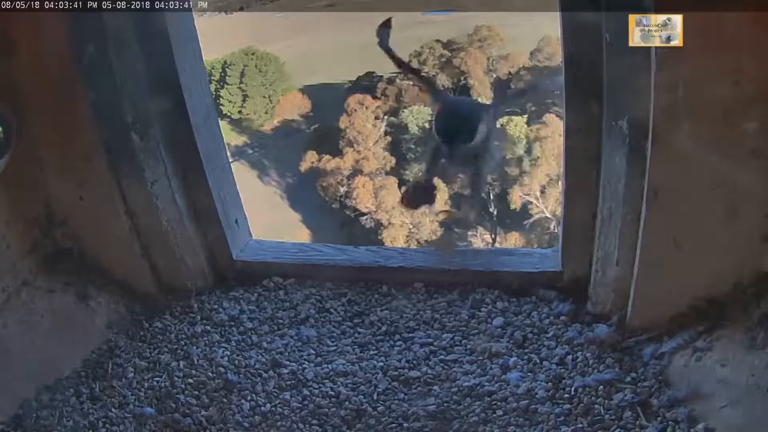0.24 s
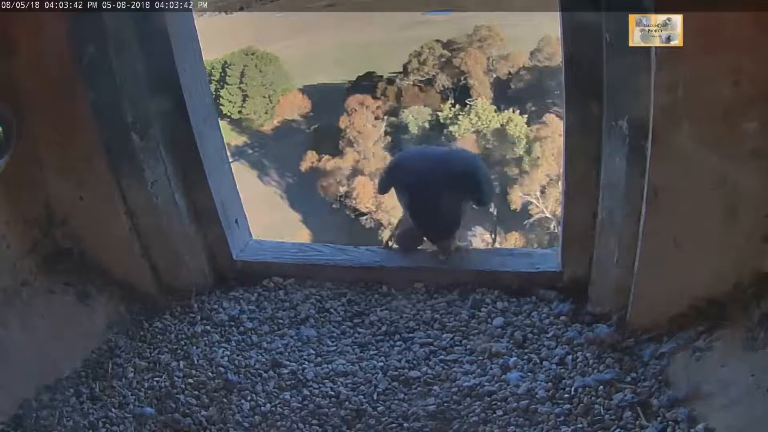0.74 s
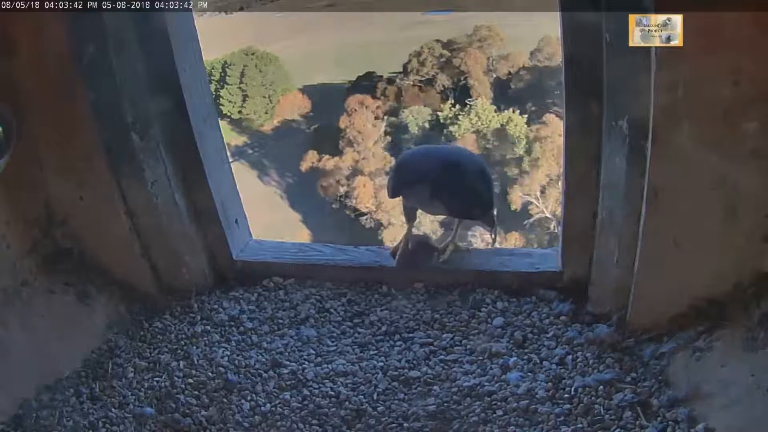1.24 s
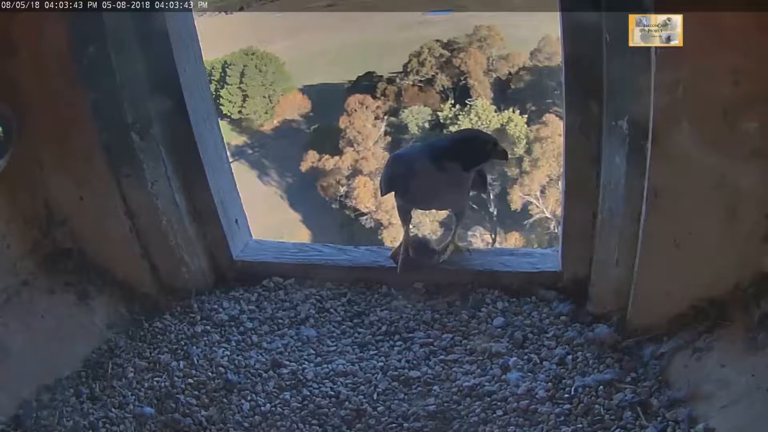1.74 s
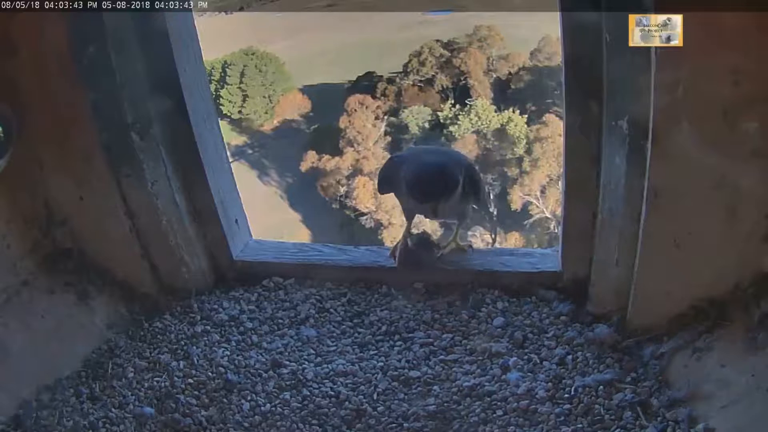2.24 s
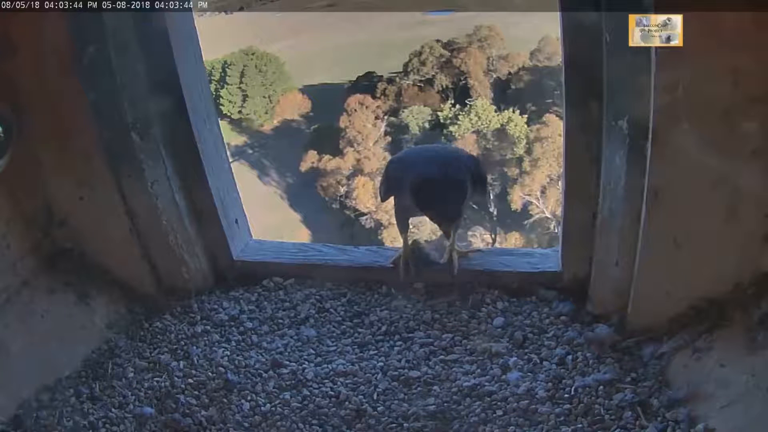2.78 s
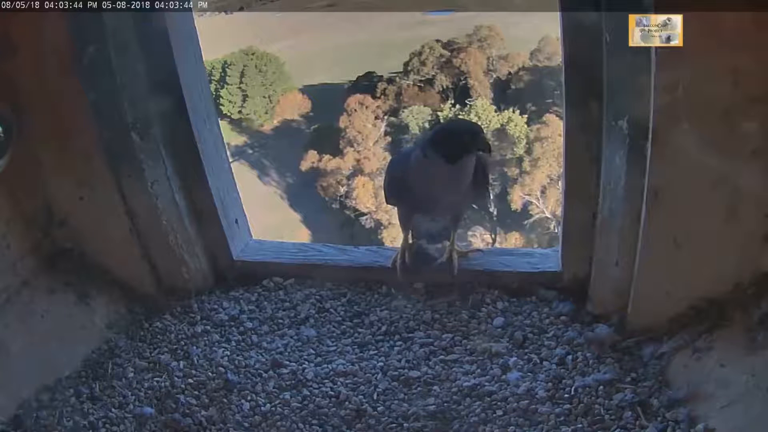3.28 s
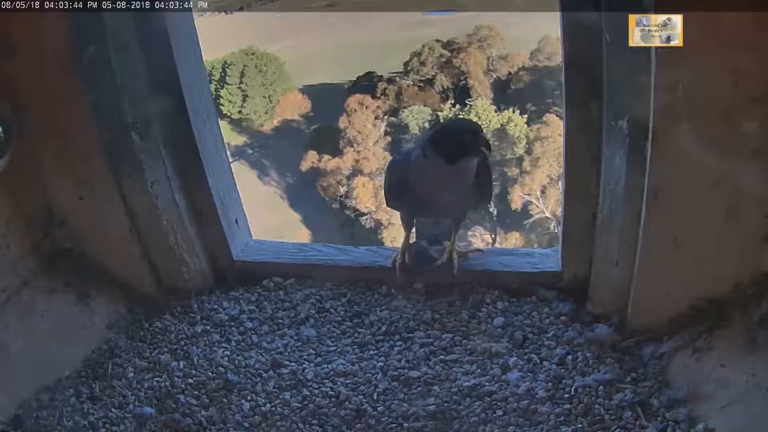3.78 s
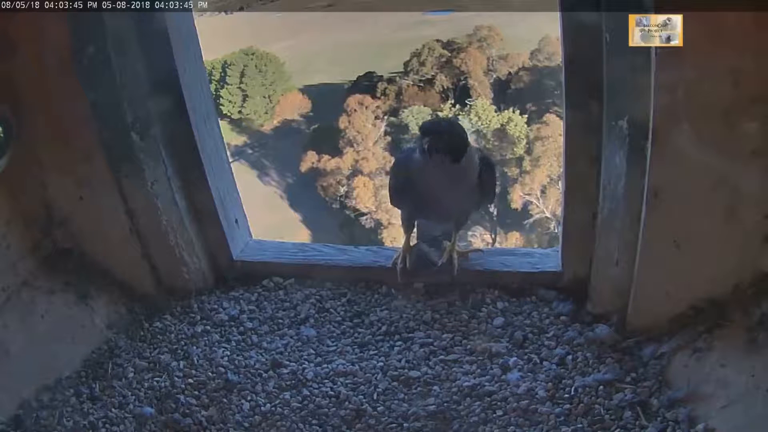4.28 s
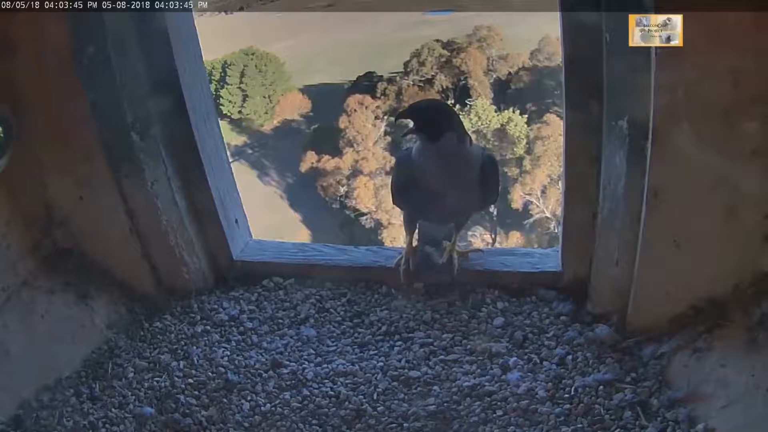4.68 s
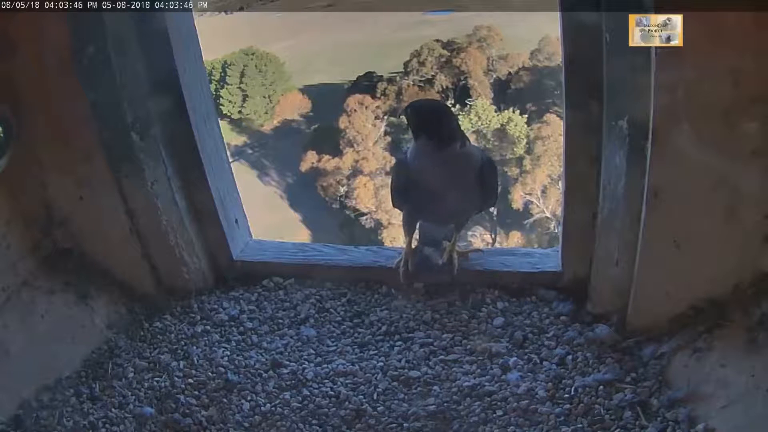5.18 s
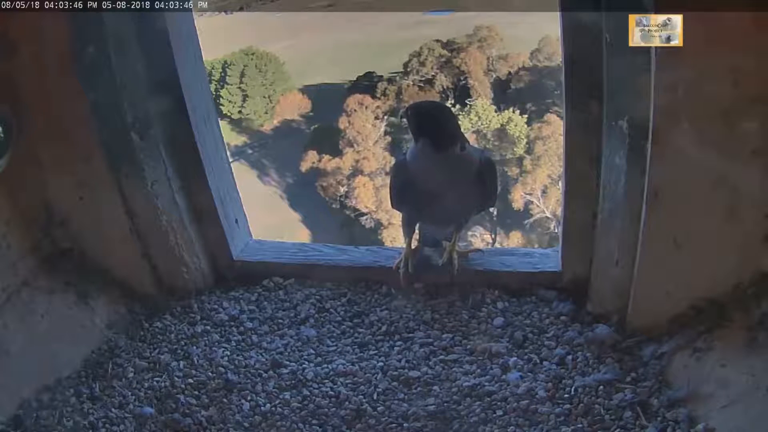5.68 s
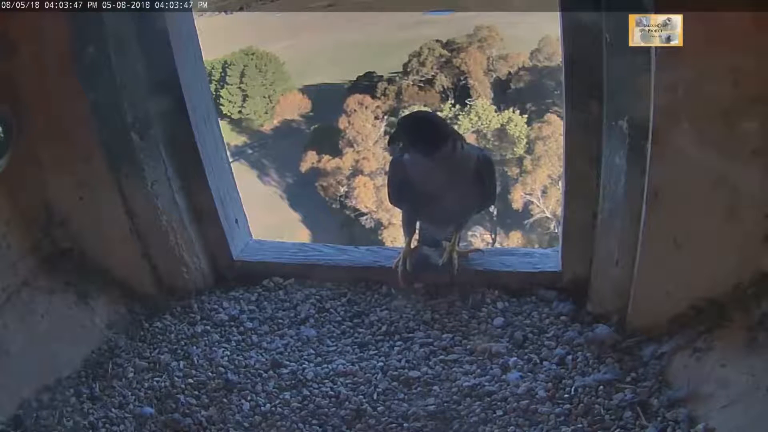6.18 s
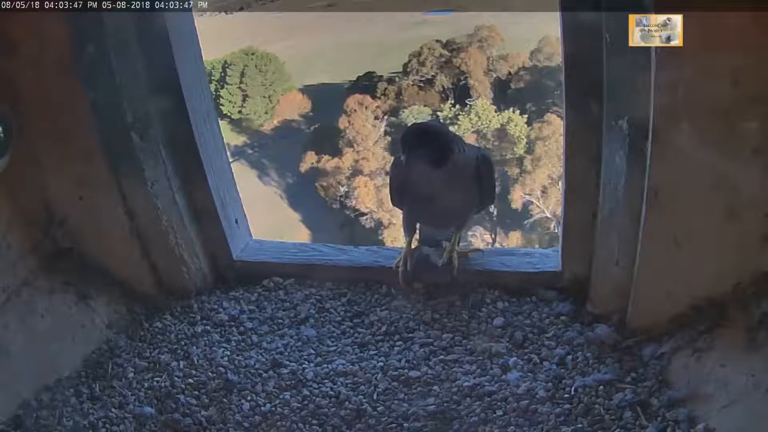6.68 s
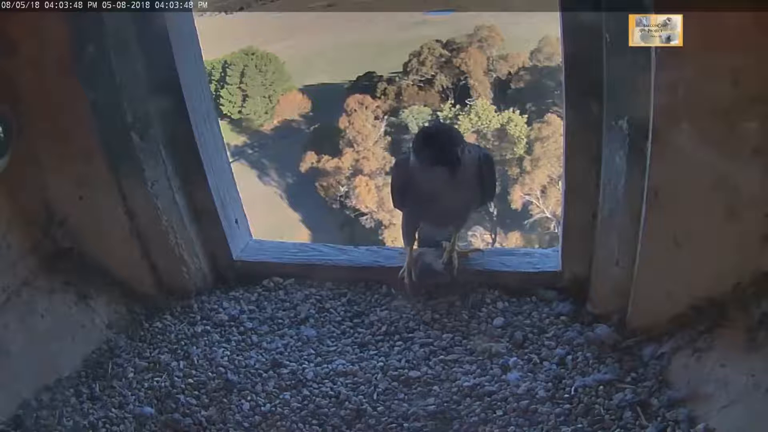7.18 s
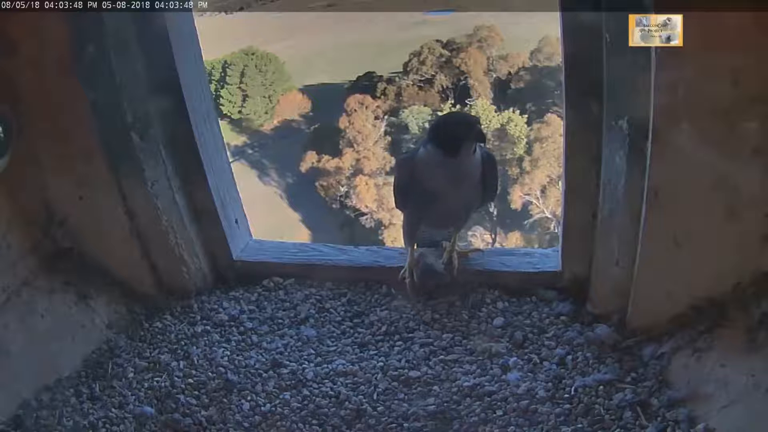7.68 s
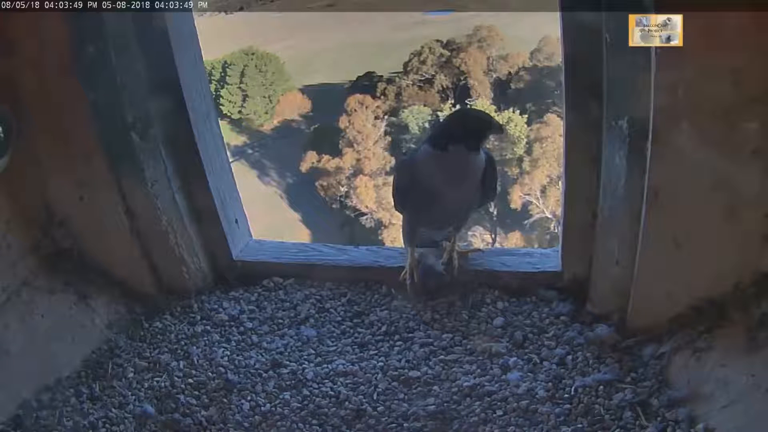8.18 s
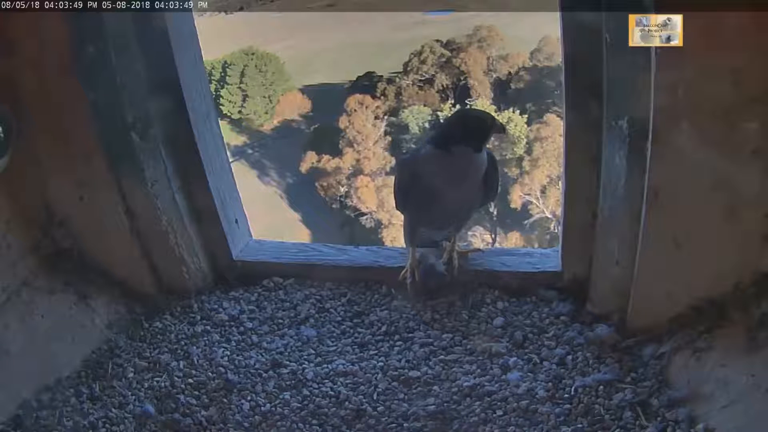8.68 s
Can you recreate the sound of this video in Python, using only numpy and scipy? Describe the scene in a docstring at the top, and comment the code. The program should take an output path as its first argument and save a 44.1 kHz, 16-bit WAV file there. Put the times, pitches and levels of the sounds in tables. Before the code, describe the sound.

A falcon arrives at a wooden nest box with low, soft wing-beat thumps and a knock of feet with a light talon scratch. It calls at once and keeps calling: thin rising whistles snapping into sharp chips that sink into short croaks, mixed with brief yelps. The close microphone catches hard reflections and a ringing tail, over faint hiss and low air rumble.

```python
"""A falcon lands on the ledge of a nest box and calls "ee-chup" again and again, close to a small camera.
Its voice is built from gliding tones and pulses in four registers: a low pulsed croak, a clear yelp,
a sharp chip and a thin whistle. Wing beats are slow swings of pressure; feet knock on the ledge and scratch.
Decaying noise makes the near walls reflect and the box ring on after each sound.
Shaped noise makes a faint hiss and a low rumble of air."""
import sys
import numpy as np
from scipy import signal
from scipy.fft import rfft, irfft, next_fast_len
from scipy.io import wavfile
from scipy.ndimage import map_coordinates

SR = 44100
rng = np.random.default_rng(int(sys.argv[2]) if len(sys.argv) > 2 else 0)


def transcribe(u):
    """Save the signal u as a 16-bit wav file named by the first command-line argument.

    u: samples, shape (n,) or (channels, n), limited to [-1, 1]; the rate is SR.
    q: integer samples, one column per channel.
    """
    v = np.clip(np.atleast_2d(u).T, -1, 1)
    q = np.round(v * 32767).astype(np.int16)
    wavfile.write(sys.argv[1], SR, q)


N = 393870

# All voice levels are relative: each register is trimmed once more in the mix.
# "ee-chup" calls, a rising whistle, then a chip that sinks into a croak:
# whistle [t/s, length/s, start f/Hz, end f/Hz, level/dB],
# chip [t/s, mid f/Hz, level/dB, octave level/dB, half-tone level/dB], croak [level/dB]
CHUP_CALLS = [(.708, 0.039, 4890, 5190, -40, .783, 2497, -28.5, -30, -56, -47),
              (1.117, 0.043, 4445, 4507, -36.5, 1.155, 2508, -40, -35, -68, -42),
              (1.736, 0.073, 3900, 4480, -43.5, 1.798, 2340, -43.5, -38, -54.5, -39),
              (2.256, 0.082, 3830, 4440, -41.5, 2.320, 2406, -35.5, -31, -59.5, -37.5),
              (3.191, .068, 4690, 4873, -33.5, 3.243, 2489, -33, -39.5, -39, -40.5),
              (3.627, .079, 4040, 4800, -38, 3.698, 2476, -30.5, -29, -53.5, -41.5),
              (4.456, 0.071, 3860, 4660, -44, 4.512, 2372, -38, -34.5, -50.5, -41.5),
              (5.004, 0.064, 3760, 4270, -42.5, 5.072, 2310, -45, -42, -66.5, -44),
              (5.996, .053, 3670, 4300, -46.5, 6.050, 2394, -43.5, -42, -65.5, -47.5),
              (6.783, 0.076, 4480, 4880, -39, 6.843, 2429, -34.5, -36, -39, -40.5),
              (7.516, .042, 4150, 5100, -39.5, 7.598, 2567, -29.5, -30.5, -54, -39.5),
              (8.764, 0.044, 4120, 4800, -44, 8.814, 2410, -41.5, -42.5, -43, -40)]
# yelps, each breaking out of a rising croak:
# [croak t/s, length from croak start to yelp end/s, mid f/Hz, fall/octaves, yelp level/dB, croak level/dB]
YELP_CALLS = [(1.061, 0.069, 1112, 0.14, -44.5, -35), (2.686, 0.079, 1195, .15, -29, -36.5),
              (3.133, 0.058, 1165, 0.15, -43, -47), (4.114, .063, 1146, 0.29, -32, -32),
              (6.463, 0.07, 1159, .18, -33.5, -37), (7.328, 0.078, 1235, .18, -32, -43.5),
              (8.351, 0.066, 1167, .24, -32.5, -36)]
HARD_CHIP_DB = -31  # reference: weaker chips sag further and their croaks last longer


def amp(db):
    """Amplitude factor of a level in dB."""
    return 10 ** (np.asarray(db) / 20)


def unit(x):
    """x scaled to rms 1."""
    return x / np.sqrt(np.mean(x ** 2) + 1e-20)


def colour(points):
    """Gain as a function of frequency, from (f/Hz, level/dB) points on a log axis."""
    f, db = np.transpose(points)
    return lambda hz: amp(np.interp(np.log(hz + 1), np.log(f + 1), db))


def filtered(x, response):
    """x shaped by a response (gain or complex) of frequency."""
    m = next_fast_len(len(x) + 4096)
    spectrum = rfft(x, m) * response(np.fft.rfftfreq(m, 1 / SR))
    return irfft(spectrum, m)[:len(x)]


def resonance(f, hz, width):
    """Causal response of one resonance, 1 at its centre."""
    return 1j * f * width / (hz * hz - f * f + 1j * f * width)


def throat(f):
    """All resonances of the rough voice together; each acts twice, which leaves dark valleys."""
    # resonances of throat and box: [f/Hz, width of a single pass/Hz, relative level/dB]
    throat_modes = [(421, 1500, -17), (991, 280, -13.5), (1242, 230, 5.5), (1552, 86, 3), (2461, 100, -2.5),
                    (3042, 190, -3), (3510, 590, -14.5), (4460, 550, -14.5), (6160, 180, -25),
                    (6540, 820, -22)]
    return sum(amp(db) * resonance(f, hz, width) ** 2 for hz, width, db in throat_modes)


def wobble(n, rate):
    """A smooth random curve of n samples, rate knots a second."""
    knots = rng.standard_normal(int(n * rate / SR) + 4)
    return map_coordinates(knots, [np.arange(n) * rate / SR])


def add(track, s, sound):
    """Mix a sound into the track at time s."""
    part = track[round(s * SR):][:len(sound)]
    part += sound[:len(part)]


def fall(hz, octaves):
    """Start and end pitch of a fall centred on hz."""
    return hz * 2 ** (octaves / 2), hz / 2 ** (octaves / 2)


def note(start, end, from_hz, to_hz, crest, jitter, shimmer_db, flutter_rate, swell, bend):
    """Phase and envelope (rms 1) of one unsteady glide of the syrinx.

    The crest is where a note is loudest, 0-1 of its length; bend under 1 glides fast first, then levels off.
    """
    u = np.linspace(0, 1, round((end - start) * SR))
    glide = from_hz * (to_hz / from_hz) ** (u ** bend)
    pitch = glide * (1 + jitter * wobble(len(u), flutter_rate))
    arch = np.interp(u, [0, np.clip(crest, .05, .95), 1], [0, np.pi / 2, np.pi])
    envelope = np.abs(np.sin(arch)) ** swell * amp(shimmer_db * wobble(len(u), flutter_rate))
    return 2 * np.pi * np.cumsum(pitch) / SR, unit(envelope)


def rasp(n, spectrum):
    """Noise of a given colour, rms 1: turbulent air in the syrinx, or the air and hiss of the background."""
    return unit(filtered(rng.standard_normal(n), colour(spectrum)))


def background():
    """Steady hiss, and air rumbling softly around the box: two coloured noises."""
    hiss_colour = [(200, -4), (600, -5), (900, -6), (1250, 1), (1650, -7.5), (2000, -11), (2450, -3),
                   (3500, -7.5), (4200, -9), (4750, -0.5), (5250, -14.5), (5750, 6), (6250, -7), (6650, -5),
                   (7500, -4.5)]  # spectrum of the hiss: [f/Hz, relative level/dB]
    rumble_colour = [(12, -9.5), (22, -4), (40, -0.5), (65, -3.5), (100, -13.5), (135, -16.5), (200, -7.5),
                     (260, -22), (350, -25), (500, -36), (700, -43), (1500, -80.5)]  # spectrum of the moving air: [f/Hz, relative level/dB]
    rumble_course = [(1.0, -68), (1.41, -67), (5.39, -70), (5.89, -73), (6.56, -71.5), (8.8, -70.5)]  # slow course of the rumble: [t/s, relative level/dB]
    hiss = amp(-73.0) * rasp(N, hiss_colour)
    s, db = np.transpose(rumble_course)
    swell_db = np.interp(np.arange(N) / SR, s, db - db.mean())
    rumble = amp(-63 + swell_db + 0.47 * wobble(N, 30)) * rasp(N, rumble_colour)
    return hiss + rumble


def landing():
    """Each wing beat is one slow swing of pressure; the feet knock on the ledge and the talons scratch it."""
    # wing beats pushing air at the microphone: [mid t/s, peak level/dB, swing rate f/Hz]
    wing_beats = [(0.251, -40.5, 24), (0.384, -34.5, 24), (0.49, -36.5, 31), (.515, -39.5, 17),
                  (0.631, -38, 27), (0.714, -39.5, 39)]
    foot_steps = [(0.386, -58), (.641, -36.5), (.662, -50), (0.69, -45.5), (2.921, -47)]  # feet on the wooden ledge: [t/s, relative level/dB]
    ledge_modes = [(202, -5, 0.54), (264, -1, 0.22), (298, -6.5, 0.04)]  # ringing of the wood: [f/Hz, relative level/dB, t60/s]
    out, t = np.zeros(N), np.arange(SR // 4) / SR
    for s, db, hz in wing_beats:
        u = 2 * np.pi * hz * (t - t.mean())
        swing = u * np.exp((1 - u * u) / 2)  # one dip and one push, peak 1
        add(out, s - t.mean(), amp(db) * swing)
    for s, db in foot_steps:
        ring = sum(amp(level - 60 * t / t60) * np.sin(2 * np.pi * hz * t + rng.uniform(0, 2 * np.pi))
                   for hz, level, t60 in ledge_modes)
        scratch = amp(-16 - 60 * t / 0.1) * unit(filtered(rng.standard_normal(len(t)), throat))
        attack = 1 - np.exp(-t / 0.00099)
        add(out, s, amp(db - 6.0) * (ring + scratch) * attack)
    return out


def box_ring(x):
    """Clusters of modes ring on for up to a second and a half, never twice quite alike."""
    # long ringing of the box: [f/Hz, width of a single pass/Hz, relative level/dB, t60/s]
    box_modes = [(270, 450, -3.5, 1.8), (1280, 700, -11.5, 2.4), (1650, 43, 6, 7.5), (2452, 330, 0.5, 1.5),
                 (2765, 305, 6.5, 2.3), (3080, 90, 11, 1), (3568, 630, 4, 1.2), (4640, 210, -6, 3),
                 (5594, 490, 5.5, 0.92), (7000, 370, -2, 5.7)]
    t = np.arange(3 * SR // 2) / SR
    out = np.zeros(N)
    window = signal.get_window("hann", SR)
    # overlapping one-second pieces of the sound, each with a fresh random tail
    for first in range(-SR // 2, N, SR // 2):
        tail = np.zeros(len(t))
        for hz, width, db, t60 in box_modes:
            strikes = rng.standard_normal(len(t)) * amp(-60 * t / t60)
            strikes /= np.linalg.norm(strikes)
            tail += amp(db) * filtered(strikes, lambda f: resonance(f, hz, width) ** 2)
        piece = np.pad(x, SR)[first + SR:][:SR] * window
        piece = piece[max(-first, 0):]
        add(out, max(first, 0) / SR, signal.fftconvolve(piece, tail))
    return out


def whistle_notes():
    """The more a whistle climbs, the later it is loudest; all swoops land on one pitch."""
    # swoops, where the whistle dives, mostly into a chip: [t/s, length/s, start f/Hz, level/dB]
    swoop_dives = [(.772, .018, 4920, -32.5), (1.799, 0.018, 3690, -35.5), (2.781, 0.031, 4640, -51.5),
                   (7.588, 0.025, 4430, -31)]
    full_rise_hz, level_crest, climbing_crest = 596, .03, .55  # a level whistle starts hard, a climbing one swells
    for s, length, from_hz, to_hz, db, *_ in CHUP_CALLS:
        crest = np.interp(to_hz - from_hz, [0, full_rise_hz], [level_crest, climbing_crest])
        yield s, s + length, from_hz, to_hz, crest, db
    swoop_to_hz, swoop_crest = 3563, .15
    for s, length, from_hz, db in swoop_dives:
        yield s, s + length, from_hz, swoop_to_hz, swoop_crest, db


def whistles():
    """A thin gliding tone; its weak half tone speaks where it meets a resonance of the throat."""
    out = np.zeros(N)
    for start, end, from_hz, to_hz, crest, db in whistle_notes():
        phase, envelope = note(start, end, from_hz, to_hz, crest, jitter=.009, shimmer_db=2.0,
                               flutter_rate=250, swell=0.24, bend=0.75)
        octave = amp(-11.5) * np.sin(2 * phase)
        half = amp(-20) * filtered(np.sin(phase / 2), throat)
        side = amp(-20.5) * wobble(len(phase), 400) * np.sin(phase + phase / 2)
        air = rasp(len(phase), [(1500, -20.5), (2600, -8.0), (3400, -14.5),
                                (4600, -5.5), (5400, -0.5), (6600, -8.0)])
        strain = np.linspace(.35, 1.2, len(phase)) ** 1.5  # the tone frays towards its end
        frayed = strain * (side + amp(-15.5) * air)
        add(out, start, amp(db - 2.0) * envelope * (np.sin(phase) + octave + half + frayed))
    return out


def walls(x):
    """Quick, dense reflections from the near walls, stronger in the treble."""
    wall_echo = [(250, -9), (1200, -11.5), (2500, -0.5), (5000, -4), (7000, -3.5)]  # share that the walls send back: [f/Hz, level/dB]
    t = np.arange(SR // 8) / SR
    t60 = .05  # s
    echoes = rng.standard_normal(len(t)) * amp(-60 * t / t60) * (t > .002)
    echoes /= np.linalg.norm(echoes)
    return filtered(signal.fftconvolve(x, echoes)[:N], colour(wall_echo))


def yelp_notes():
    """A yelp falls out of its croak; the same register also sounds briefly, an octave under each chip."""
    yelp_delay_s, yelp_crest, yelp_bright_db = 0.013, 0.46, -14.5  # bright: overtones, relative
    for s, length, hz, octaves, db, _ in YELP_CALLS:
        yield s + yelp_delay_s, s + length, *fall(hz, octaves), yelp_crest, db, yelp_bright_db
    half_lead_s, half_s, half_crest, half_bright_db = .004, .027, 0.15, -7  # the chip's half tone
    for *_, chip_s, hz, _, _, db, _ in CHUP_CALLS:
        s = chip_s - half_lead_s
        yield s, s + half_s, hz / 2, hz / 2, half_crest, db, half_bright_db


def yelps():
    """A nearly pure tone fades as it falls out of the throat's resonance; high overtones flare in mid-note."""
    yelp_overtones = [(2, -14), (3, -8), (4, -1.5), (5, 0.5), (6, -10.5)]  # overtones of a yelp: [multiple of the pitch, relative level/dB]
    out = np.zeros(N)
    for start, end, from_hz, to_hz, crest, db, bright_db in yelp_notes():
        phase, envelope = note(start, end, from_hz, to_hz, crest, jitter=0.0034, shimmer_db=2.5,
                               flutter_rate=260, swell=0.61, bend=1.2)
        pitch = np.gradient(phase) * SR / (2 * np.pi)
        envelope = unit(envelope * np.abs(resonance(pitch, hz=1248, width=180)) ** 2)
        overtones = sum(amp(level + 3.6 * wobble(len(phase), 130)) * np.sin(k * phase)
                        for k, level in yelp_overtones)
        air = rasp(len(phase), [(800, -26), (1300, 10.5), (2000, -16.0),
                                (3000, -5), (5000, -16.0), (7000, -12)])
        tone = envelope * (np.sin(phase) + amp(-27.5) * air)
        halo = amp(bright_db + 1.5) * overtones * np.hanning(len(phase)) ** 0.81
        add(out, start, amp(db - 0.7) * (tone + halo))
    return out


def chip_notes():
    """Chips plunge further the weaker they are; squeaks barely fall."""
    # squeaks, soft chips where the voice flips register, mostly as a yelp dies: [t/s, length/s, mid f/Hz, level/dB]
    soft_squeaks = [(2.757, 0.045, 2801, -44), (3.621, 0.022, 2463, -40.5), (4.173, .028, 2500, -44.5),
                    (6.531, 0.016, 2480, -46.5), (7.4, 0.018, 2667, -48.5), (8.41, 0.024, 2456, -49.5)]
    chip_s, chip_crest, chip_third_db = .027, 0.5, -47
    fall_oct, sag_oct_per_db = .17, 0.0248
    for *_, s, hz, db, octave_db, _, _ in CHUP_CALLS:
        octaves = fall_oct + sag_oct_per_db * (HARD_CHIP_DB - db)
        yield s, s + chip_s, *fall(hz, octaves), chip_crest, db, octave_db - db, chip_third_db - db
    squeak_fall_oct, squeak_crest = 0.046, 0.42
    second_db, third_db = -4, -23.5  # harmonics, relative
    for s, length, hz, db in soft_squeaks:
        yield s, s + length, *fall(hz, squeak_fall_oct), squeak_crest, db, second_db, third_db


def chips():
    """The hard-blown middle of the call: three plunging harmonics, a wavering side tone between them, and rasp."""
    out = np.zeros(N)
    for start, end, from_hz, to_hz, crest, db, second_db, third_db in chip_notes():
        phase, envelope = note(start, end, from_hz, to_hz, crest, jitter=.019, shimmer_db=2.5,
                               flutter_rate=550, swell=1.3, bend=.75)
        pitch = np.gradient(phase) * SR / (2 * np.pi)
        # first and third harmonic swell as they cross a resonance
        first = unit(envelope * np.abs(resonance(pitch, hz=2460, width=300)))
        third = unit(envelope * np.abs(resonance(3 * pitch, hz=6650, width=410)))
        tone = first * np.sin(phase)
        tone += amp(second_db) * envelope * np.sin(2 * phase)
        tone += amp(third_db + 3.5) * third * np.sin(3 * phase)
        side = amp(-21.5) * envelope * wobble(len(phase), 250) * np.sin(phase + phase / 2)
        air = rasp(len(phase), [(800, -32.0), (1300, 0.5), (1900, -25), (2600, -8.5), (4000, -8.5),
                                (4750, -6.5), (5500, -6.5), (6700, 4), (7400, -26.0)])
        breakup = amp(-15) * np.std(tone) * np.sqrt(envelope) * air
        add(out, start, amp(db - 1.66) * (tone + side + breakup))
    return out


def croak_notes():
    """A rising croak opens each yelp or stands alone; a sinking one closes each chip."""
    # grunts, rising croaks that never reach a yelp: [t/s, length/s, start f/Hz, level/dB]
    lone_grunts = [(2.237, 0.017, 262, -50.5), (3.603, 0.021, 284, -56), (4.985, .02, 286.5, -55.5),
                   (5.47, .066, 439.6, -40)]
    open_s, attack_s, open_from_hz = .024, .013, 290
    open_db, open_to_hz, hz_per_db = -37, 614.6, 10.5  # a louder croak climbs higher
    open_low_db, low_db_per_oct = -51.5, -15  # its fundamental, weaker when pitched higher
    openings = [(s, open_s, open_from_hz, db) for s, *_, db in YELP_CALLS]
    for s, length, hz, db in openings + list(lone_grunts):
        top_hz = open_to_hz + hz_per_db * (db - open_db)
        low_db = open_low_db + low_db_per_oct * np.log2(hz / open_from_hz)
        yield s, s + length, hz, top_hz, attack_s / length, db, low_db - db
    close_delay_s, close_s, s_per_db = .0215, .037, .0002  # it lasts longer after a weak chip
    close_from_hz, close_to_hz, close_crest = 540, 198.7, 0.18
    close_db, close_low_db, low_follows = -40, -48.5, 0.49  # typical croak, its fundamental, dB per dB
    for *_, chip_s, _, chip_db, _, _, db in CHUP_CALLS:
        s = chip_s + close_delay_s
        length = close_s + s_per_db * (HARD_CHIP_DB - chip_db)
        low_db = close_low_db + low_follows * (db - close_db)
        yield s, s + length, close_from_hz, close_to_hz, close_crest, db, low_db - db


def croaks():
    """Slow, uneven pulses ring the throat above a soft fundamental; slower pulses are weaker."""
    out = np.zeros(N)
    for start, end, from_hz, to_hz, crest, db, low_db in croak_notes():
        opening = to_hz > from_hz
        phase, envelope = note(start, end, from_hz, to_hz, crest, jitter=0.024, shimmer_db=4.5,
                               flutter_rate=300, swell=.7, bend=.85 if opening else .75)
        # one pulse a cycle; a closing croak loses far more force as it slows
        pulses = np.diff(phase // (2 * np.pi), prepend=0) * np.gradient(phase) ** (.1 if opening else 1.7)
        air = .12 * rng.standard_normal(len(phase)) * (1 + np.cos(phase))  # breath puffs once a cycle
        source = np.pad(envelope * (unit(pulses) + air), (0, SR // 100))
        bark = unit(filtered(source, throat))
        low = np.sin(phase) * signal.get_window(("tukey", .4), len(phase))
        low = np.pad(low, (0, SR // 25))
        # the box's lowest mode picks up the end of the fall
        boom = filtered(low, lambda f: 1 + 1.9 * resonance(f, hz=196, width=29))
        add(out, start, amp(db - 4.5) * bark)
        add(out, start, amp(db + low_db + 4.0) * boom)
    return out


def scene():
    """The bird close by, its echoes in the box, and the air."""
    voice = croaks() + yelps() + chips() + whistles()
    near = voice + landing()
    ring = amp(-12) * box_ring(near)
    return near + walls(voice) + ring + background()


def record(dry):
    """The camera's narrow band ends steeply in the treble; its converter sits slightly off zero."""
    mic_rolloff = [(6800, 0), (7300, -10), (7650, -27), (8200, -44)]  # treble roll-off of the microphone: [f/Hz, level/dB]
    top_hz, offset = 8070, .0138  # nothing passes from top_hz up; offset is a share of full scale
    return filtered(dry, lambda hz: colour(mic_rolloff)(hz) * (hz < top_hz)) + offset


dry = scene()
out = record(dry)
transcribe(out)
```